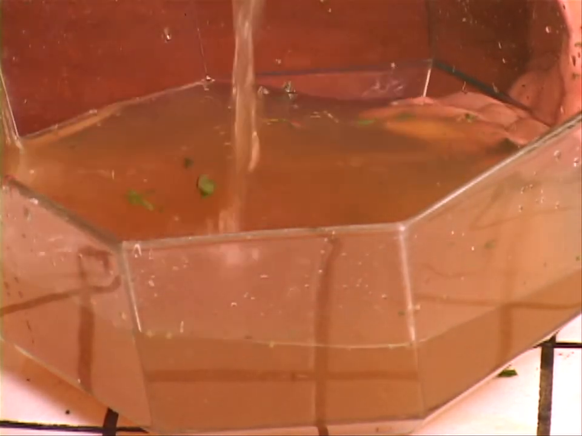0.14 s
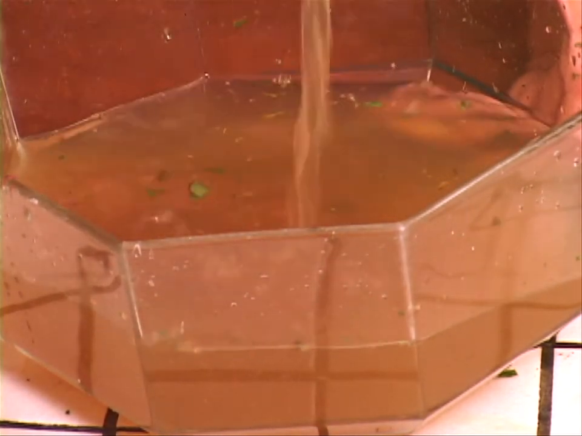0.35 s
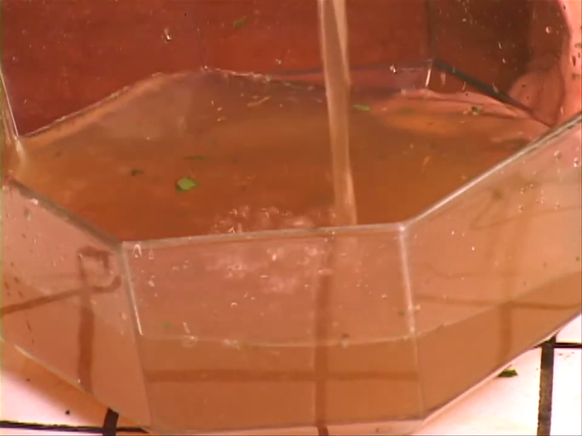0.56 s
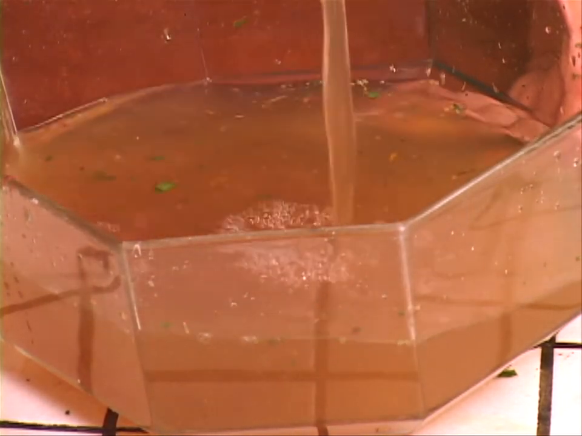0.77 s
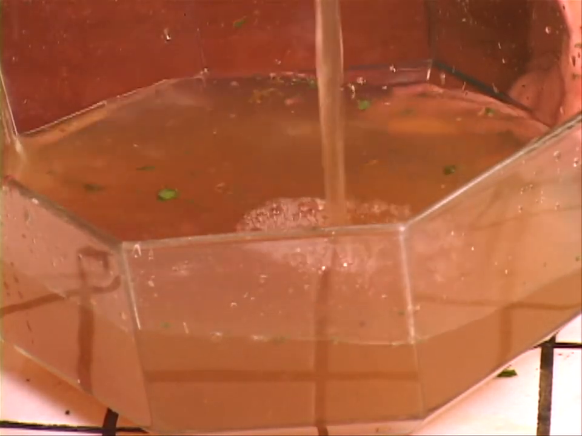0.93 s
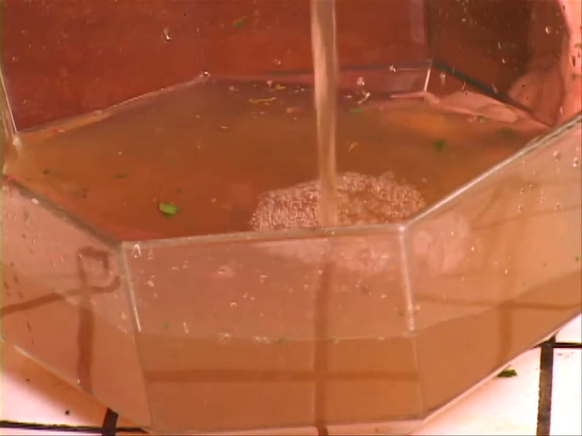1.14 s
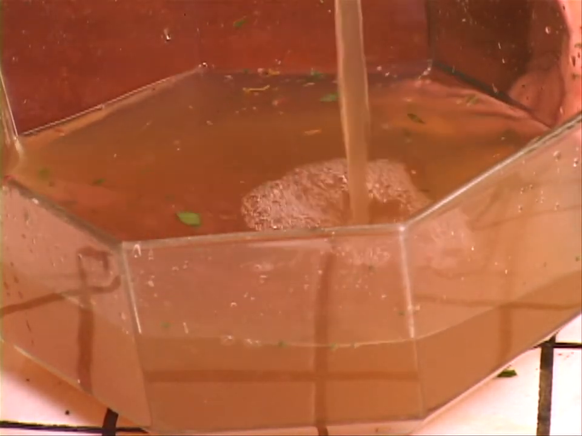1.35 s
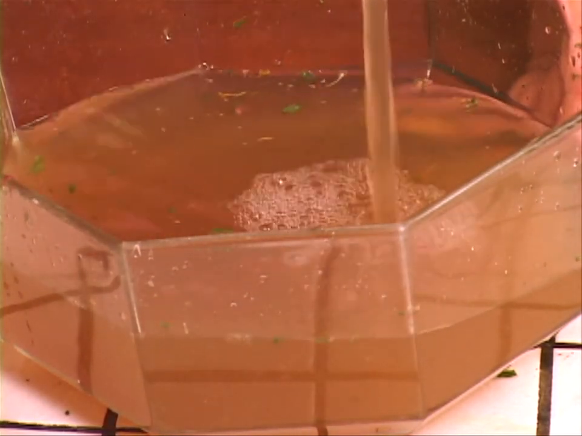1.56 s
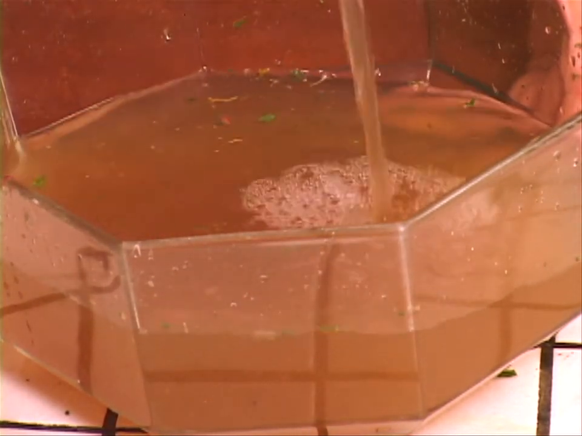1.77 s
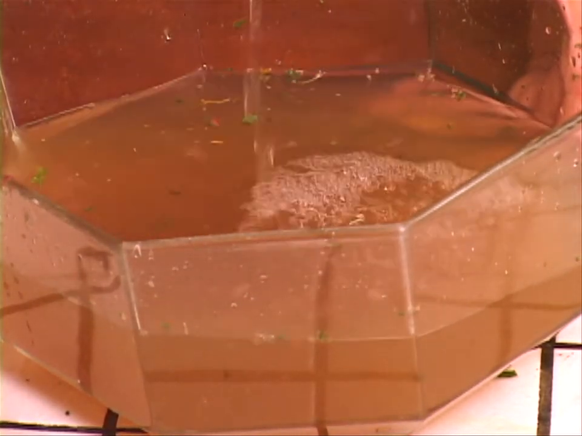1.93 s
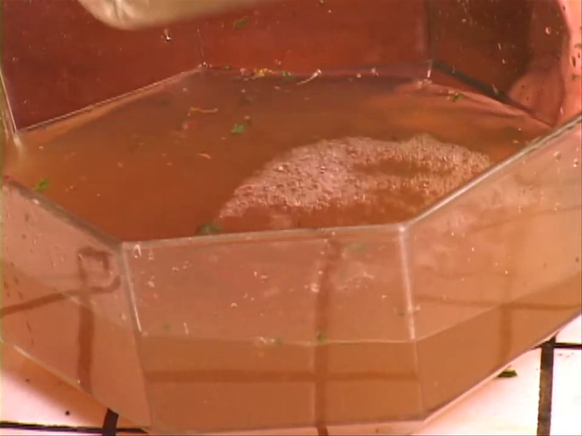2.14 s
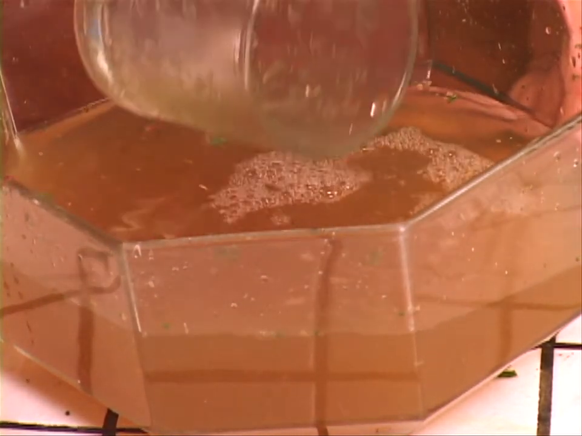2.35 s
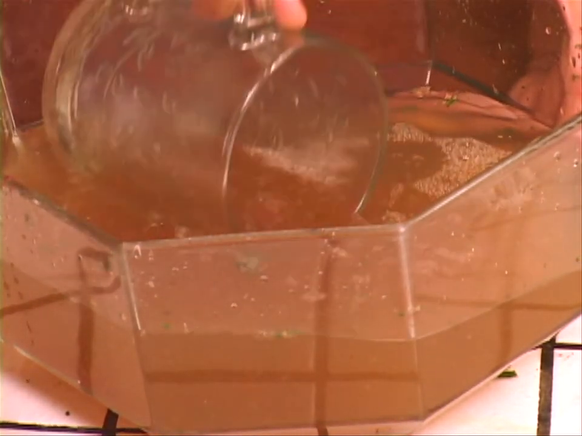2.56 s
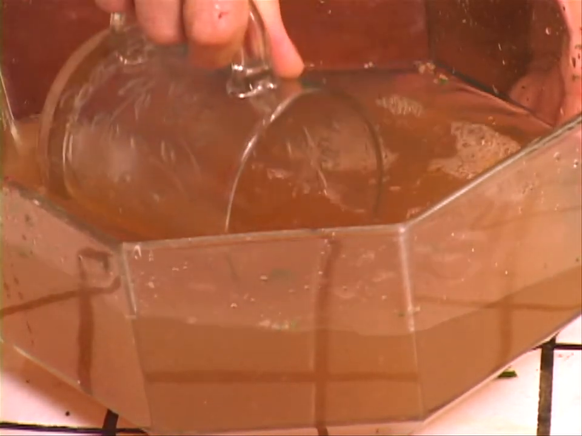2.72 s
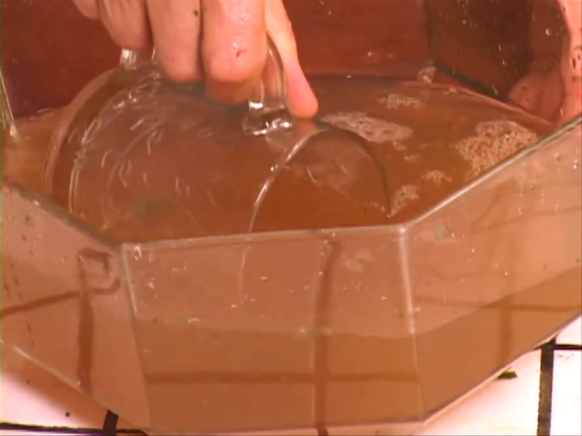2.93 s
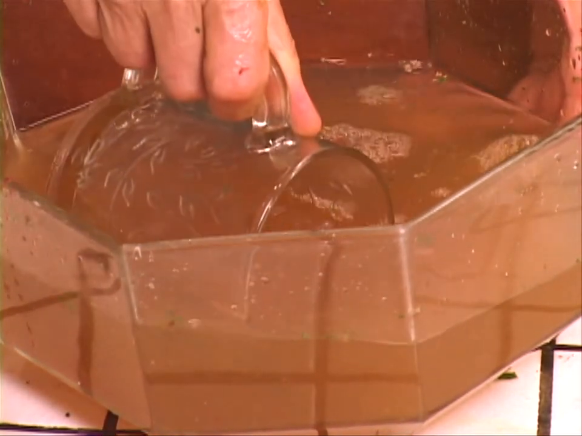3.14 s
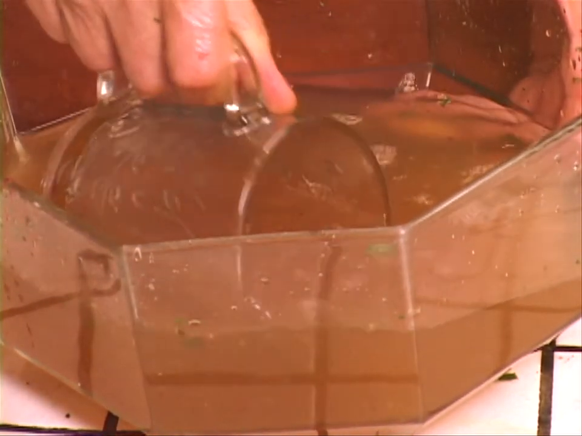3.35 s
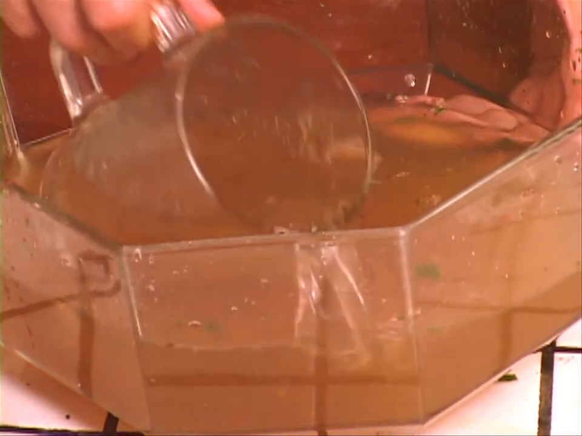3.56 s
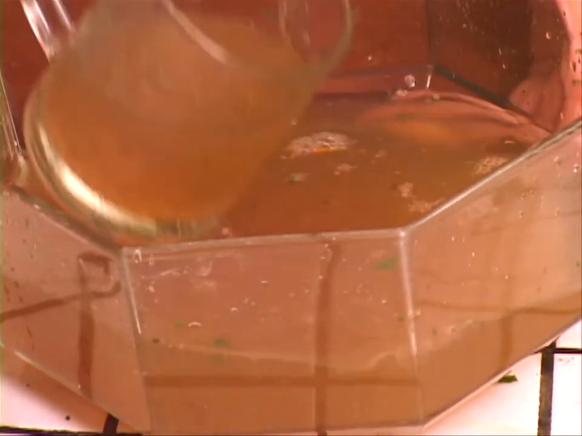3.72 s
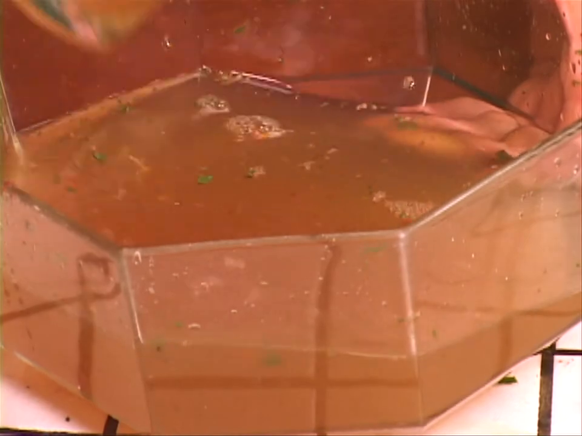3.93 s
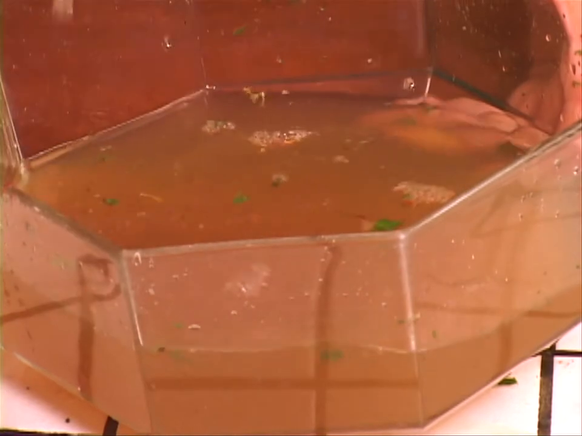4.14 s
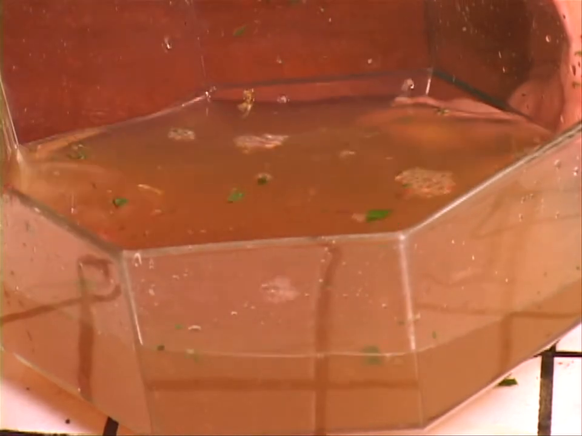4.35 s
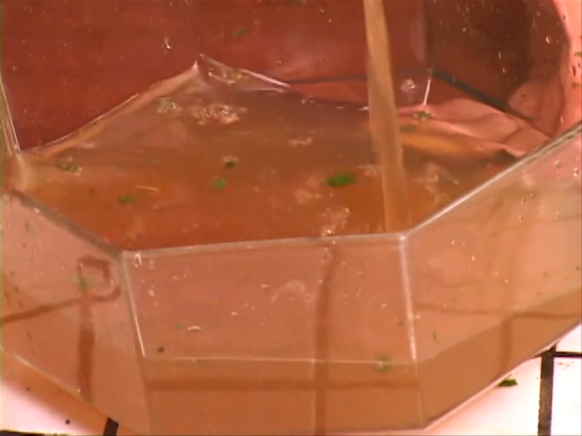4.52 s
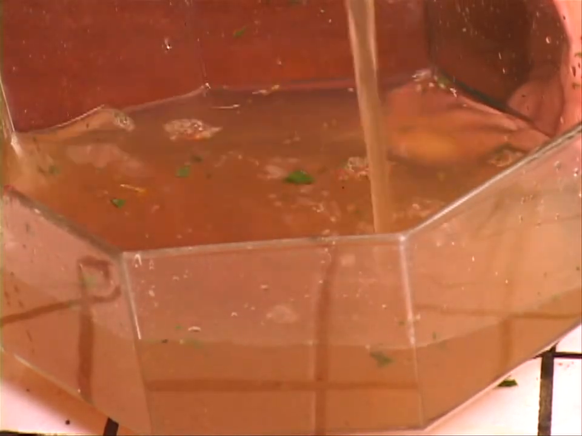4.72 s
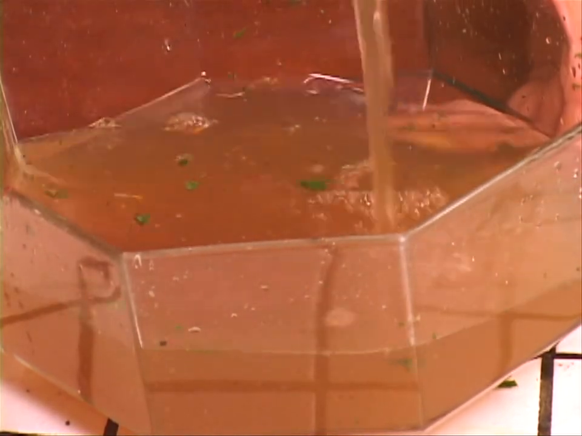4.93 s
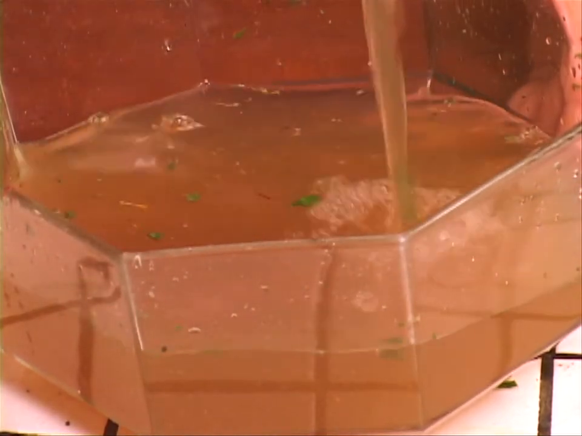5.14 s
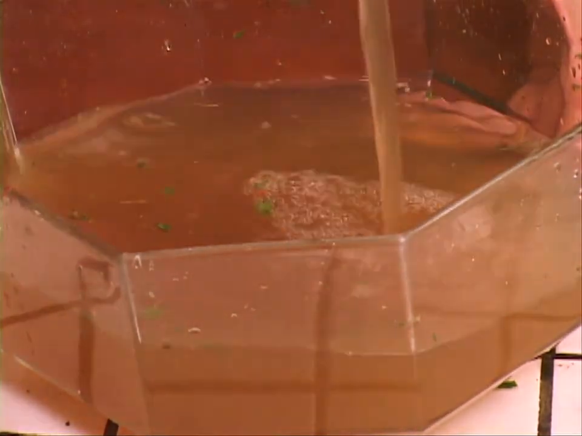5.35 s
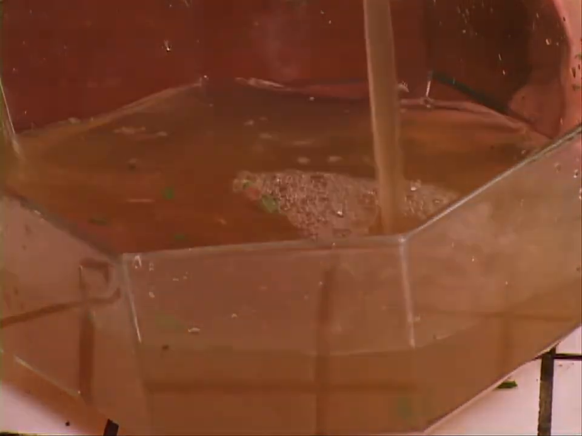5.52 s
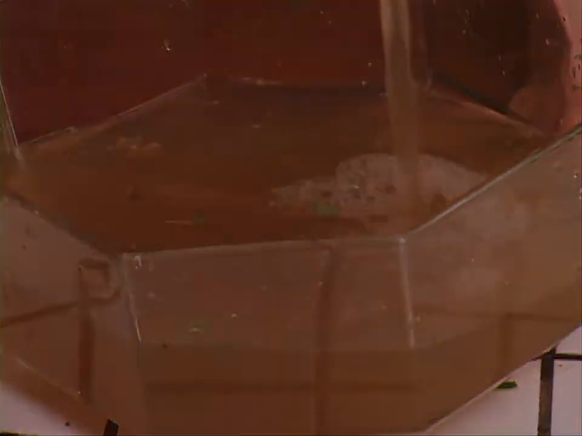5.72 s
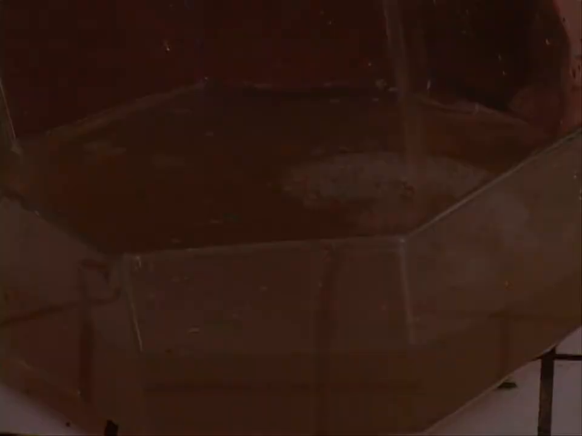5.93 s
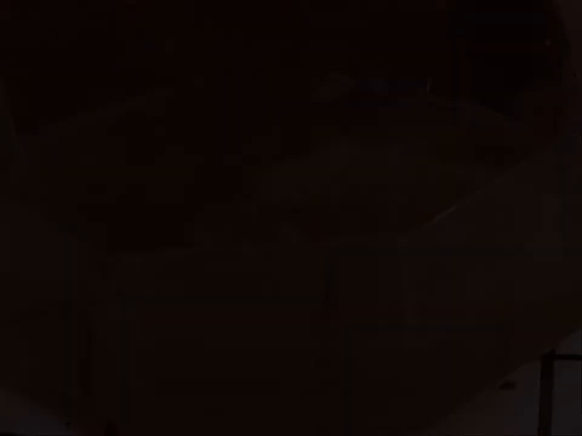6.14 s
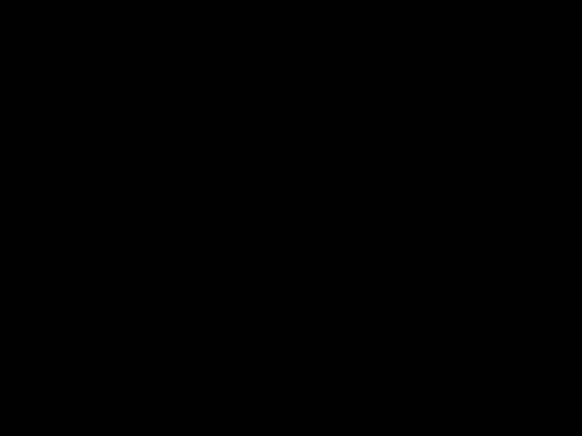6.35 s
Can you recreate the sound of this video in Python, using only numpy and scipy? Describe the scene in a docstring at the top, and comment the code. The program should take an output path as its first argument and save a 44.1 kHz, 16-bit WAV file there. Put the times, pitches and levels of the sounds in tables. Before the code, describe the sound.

In a small tiled kitchen, close to the microphone, water pours into a wide filled glass bowl with gulps, bubbles and fine ticking spray for two seconds. A quiet gap follows, with a submerged glass knock and then a sharp bright clink. A few faint drops lead to a second bubbly pour, which fades quickly to silence.

```python
"""In a small kitchen, water is poured twice from a glass mug into a wide glass bowl.
Each pour is a crowd of ringing air bubbles (short fading sine waves) with gulps and ticking spray;
stray drops plink before and after the first pour and before the second.
Between the pours the mug knocks the bowl under water and clinks on the way out (fading sines plus noise).
Air noise, a faint hum and a thin whine lie underneath, and everything fades away at the end."""
import sys
import numpy as np
from scipy import signal
from scipy.fft import rfft, irfft, next_fast_len
from scipy.io import wavfile
from scipy.ndimage import map_coordinates

SR = 44100
rng = np.random.default_rng(int(sys.argv[2]) if len(sys.argv) > 2 else 0)


def dump_mix(stems):
    """Bounce the given channels to the path in sys.argv[1] as a 16-bit WAV at rate SR."""
    frames = np.atleast_2d(stems).T  # one column per channel
    limited = np.clip(frames, -1, 1)  # hard clip at full scale
    pcm = np.round(limited * 32767).astype(np.int16)
    wavfile.write(sys.argv[1], SR, pcm)


N = 285768  # length in samples


def amp(db):
    """Turn decibels into a gain."""
    return 10 ** (np.asarray(db) / 20)


def unit(x):
    """Scale a sound to an rms level of 1."""
    return x / np.sqrt(np.mean(x ** 2) + 1e-20)


def along(points, hz):
    """Read a curve of (Hz, value) points, joined by straight lines over log frequency."""
    point_hz, value = np.transpose(points)
    return np.interp(np.log(hz + 1), np.log(point_hz), value)


def wobble(rate):
    """A smooth random curve with `rate` new random values a second."""
    knots = rng.standard_normal(int(N * rate / SR) + 4)
    return map_coordinates(knots, [np.arange(N) * rate / SR])


def coloured(x, points):
    """Filter a sound to the gains of the (Hz, dB) points, with no ringing ahead of the sound."""
    m = 2 * next_fast_len(len(x) // 2 + 4096)
    log_gain = np.log(amp(along(points, np.fft.rfftfreq(m, 1 / SR))))
    # folding the cepstrum onto positive times gives the minimum-phase filter
    cepstrum = irfft(log_gain, m)
    cepstrum[1:m // 2] *= 2
    cepstrum[m // 2 + 1:] = 0
    return irfft(rfft(x, m) * np.exp(rfft(cepstrum)), m)[:len(x)]


def add(track, s, sound):
    """Mix a sound into the track at time s, in seconds."""
    i = max(round(s * SR), 0)
    track[i:i + len(sound)] += sound[:len(track) - i]


def bubble(t, hz, t60, rise):
    """A trapped bubble rings and loses 60 dB in t60 seconds; its pitch climbs as it nears the surface."""
    age = t / t60
    cycles = hz * t * (1 + rise * np.minimum(age, 1) / 2)
    return amp(-60 * age) * np.sin(2 * np.pi * cycles)


def background(air_db, hum_db, whine_db):
    """Filtered noise for room air, a wavering appliance hum and a high electrical whine of even level."""
    # Colour of the room air. Each row: frequency in Hz, relative level in dB.
    air_colour = [(22, -24), (50, -4.5), (85, -8.5), (130, 0.5), (220, -2.5), (330, -8.5), (490, -8),
                  (600, -14.5), (1000, -16.5), (2500, -22), (6000, -23.5), (9500, -22.5), (15000, -26)]
    # Tones of the appliance hum. Each row: frequency in Hz, relative level in dB.
    hum_tones = [(60, -75), (120, -73.5), (179, -70), (209, -68), (238, -80), (297, -71.5), (356, -72),
                 (490, -70.5), (771, -82), (1655, -87.5)]
    # Tones of the electrical whine. Each row: frequency in Hz, relative level in dB.
    whine_tones = [(15630, -74), (15690.5, -69), (15731.5, -64), (15751, -79)]
    # Loudness of all three over time. Each row: time in seconds, gain in dB.
    loudness = [(0, 1.5), (5.4, 0.5), (5.9, -5)]
    t = np.arange(N) / SR
    air = amp(air_db) * unit(coloured(rng.standard_normal(N), air_colour))
    hum, whine = np.zeros(N), np.zeros(N)
    for hz, db in hum_tones:
        level = amp(db + 4.2 * wobble(5))
        hum += level * np.sin(2 * np.pi * hz * t + 0.63 * wobble(6))
    for hz, db in whine_tones:
        whine += amp(db) * np.sin(2 * np.pi * hz * t + 0.17 * wobble(7.6))
    tones = np.sqrt(2) * (amp(hum_db) * hum + amp(whine_db) * whine)  # sqrt(2): sine peak from rms
    return (air + tones) * amp(np.interp(t, *np.transpose(loudness)))


def ticks(level_db, t60, crack_db, crack_t60):
    """Flying droplets land with a tiny crack of noise and leave a very small ringing bubble."""
    # The sharpest ticks of spray. Each row: start in seconds, relative level in dB, starting pitch in Hz.
    landings = [(0.0273, -30, 8430), (0.183, -30, 9000), (0.195, -33, 8460), (0.2738, -29, 9600),
                (0.3371, -35.5, 5660), (0.4294, -32.5, 8400), (0.4883, -27, 10900), (0.4934, -28, 9600),
                (0.5152, -30.5, 9800), (0.5778, -33.5, 8500), (0.622, -30.5, 6020), (0.6845, -37, 7970),
                (0.7607, -36, 10500), (0.9996, -35, 6700), (1.3004, -32, 10120), (1.4456, -35.5, 7650),
                (1.8226, -40.5, 5830), (2.0842, -40.5, 8190), (3.6082, -42, 9700), (4.4862, -48, 13900),
                (4.593, -30, 5900), (4.7481, -32, 5250), (4.8803, -35, 11700), (4.9152, -32, 12600),
                (4.9975, -29, 7500), (5.445, -36, 9880), (5.8052, -38, 8540)]
    out, t = np.zeros(N), np.arange(SR // 40) / SR
    for s, db, hz in landings:
        crack_colour = [(1500, -26), (hz * 0.46, -13), (hz, 0), (16000, -8)]  # (Hz, dB)
        crack = unit(coloured(rng.standard_normal(len(t)), crack_colour))
        fading_crack = amp(crack_db - 60 * t / crack_t60) * crack
        add(out, s, amp(db + level_db) * (bubble(t, hz, t60, 0.15) + fading_crack))
    return out


def slap(t, hz, t60):
    """The surface closes over a bubble with a brief splash of noise, scaled to a peak of 1."""
    # Colour of the splash. Each row: multiple of the bubble's pitch, relative level in dB.
    splash_colour = [(.17, -29), (.8, -5), (1, -1.5), (1.2, -6.5), (2.6, -20.5), (8, -23.5), (25, -31.5)]
    fading_noise = rng.standard_normal(len(t)) * amp(-60 * t / t60)
    splash = coloured(fading_noise, sorted((hz * k, db) for k, db in splash_colour))
    return splash / np.abs(splash).max()


def drips(level_db, slap_db, slap_t60, rise, twin_db, twin_ratio, twin_t60):
    """A drop slaps the surface and leaves one ringing bubble with a smaller, higher twin."""
    # Plinking drops, alone or beside the stream. Each row: start in seconds, relative level in dB,
    # starting pitch in Hz, time to fall by 60 dB in seconds.
    plinks = [(0.0276, -30.5, 1870, 0.0032), (0.0882, -30, 827, .14), (0.126, -39, 2850, .04),
              (0.148, -43.5, 2650, 0.08), (0.1702, -34, 3160, 0.014), (0.251, -33, 1245, 0.021),
              (0.273, -35, 1640, 0.049), (0.391, -34.5, 1890, 0.032), (0.484, -34.5, 1840, 0.039),
              (0.686, -38, 2190, 0.025), (1.166, -38, 2006, .06), (1.241, -38.5, 2053, 0.052),
              (1.779, -36, 1160, 0.033), (2.0458, -28.5, 1214, 0.03), (2.048, -41.5, 1707, 0.029),
              (4.321, -42.5, 1386, 0.14), (4.322, -42, 1770, 0.038), (4.542, -33.5, 1270, 0.051),
              (4.545, -39.5, 1754, 0.15), (4.596, -37.5, 1845, 0.063), (4.598, -38.5, 3010, .03),
              (4.875, -39, 1894, 0.066), (4.978, -29, 2166, 0.027), (5.243, -35.5, 880, 0.012),
              (5.281, -36.5, 2480, 0.016), (5.446, -38.5, 890, 0.018)]
    out, t = np.zeros(N), np.arange(SR // 7) / SR
    for s, db, hz, t60 in plinks:
        main = bubble(t, hz, t60, rise)
        twin = amp(twin_db) * bubble(t, hz * twin_ratio, twin_t60, rise)
        splash = amp(slap_db) * slap(t, hz, slap_t60)
        add(out, s, amp(db + level_db) * (main + twin + splash))
    return out


def kitchen(x, early, early_s):
    """Tiled walls answer with fading noise, drawn afresh every third of a second as the stream moves."""
    # How long the room rings. Each row: frequency in Hz, time to fall by 60 dB in seconds.
    ring_time = [(100, 0.99), (500, 0.57), (1500, 0.49), (4000, 0.33), (14000, 0.068)]
    out, hop = np.zeros(N), SR // 3
    starts = range(0, N, hop)
    # each frequency band of the noise fades at its own speed
    hz, t, bands = signal.stft(rng.standard_normal((len(starts), hop)), SR, nperseg=256)
    fade = amp(-60 * t / along(ring_time, hz)[:, None])
    tails = signal.istft(bands * fade, SR, nperseg=256)[1]
    # near walls come first and strongest
    tails *= 1 + early * np.exp(-np.arange(tails.shape[1]) / SR / early_s)
    for i, tail in zip(starts, tails):
        echo = signal.fftconvolve(x[i:i + hop], tail / np.linalg.norm(tail))
        add(out, i / SR + .003, echo)  # the first echo is 3 ms late
    return out


def swarm(span, low_hz, high_hz, rate, cycles, spread_db, rise):
    """Bubbles of one size range are born at random, with about equal energy per Hz."""
    count = int(rate * span)
    when, size, luck, damping = rng.random((count, 4)).T
    hz = low_hz + (high_hz - low_hz) * size
    life = cycles * 2 ** (2 * damping - 1) / hz  # seconds to fall by 60 dB
    gain = amp(-spread_db * np.log(.03 + .97 * luck)) / np.sqrt(life)  # a lucky few are much louder
    t = np.arange(int(1.5 * cycles / low_hz * SR)) / SR
    grains = gain[:, None] * bubble(t, hz[:, None], life[:, None], rise)
    where = (when * span * SR).astype(int)[:, None] + np.arange(len(t))
    # add up all bubbles that sound at the same sample
    return np.bincount(where.ravel(), grains.ravel(), int(span * SR))[:int(span * SR)]


def pour(flow, colour, density, spread_db, large_db, small_db, spray_db, surge_db, flutter_db, foam_db_per_s):
    """The stream drives three sizes of bubble and surges at random; foam steadily dulls the finer two.

    A negative foam_db_per_s makes those two grow louder instead.
    """
    s, strength_db = np.transpose(flow)
    span = s[-1] - s[0]
    large = swarm(span, 241.0, 1320, rate=300 * density, cycles=27, spread_db=0.56 * spread_db, rise=0.3)
    small = swarm(span, 1281, 3910, rate=550 * density, cycles=67, spread_db=spread_db, rise=0.46)
    spray = swarm(span, 3900, 15500, rate=1700 * density, cycles=58, spread_db=1.2 * spread_db, rise=0.097)
    t = np.arange(len(large)) / SR
    edges = np.clip(np.minimum(t, span - t) / 0.038, 0, 1)  # short fades at both ends
    flow_db = np.interp(s[0] + t, s, strength_db) + surge_db * wobble(22.83)[:len(t)]
    foam_db = foam_db_per_s * t
    out = np.zeros(N)
    for grains, db in [(large, large_db), (small, small_db - foam_db), (spray, spray_db - foam_db)]:
        own_db = db + flutter_db * wobble(45.38)[:len(t)]  # each size also comes in clumps of its own
        add(out, s[0], unit(coloured(grains, colour)) * edges * amp(flow_db + own_db))
    return out


def resonant(x):
    """The open bowl's resonances ring on top of the direct sound."""
    # Fixed resonances of the bowl. Each row: frequency in Hz, width in Hz, gain in dB.
    hollow = [(500, 40, -9), (600, 45, -8), (1040, 45, -1), (2090, 60, -5), (2780, 110, -7), (3430, 90, -5)]
    m = next_fast_len(N)
    f = np.fft.rfftfreq(m, 1 / SR)
    response = 1
    for hz, width, db in hollow:
        response = response + amp(db) * 1j * f * width / (hz * hz - f * f + 1j * f * width)
    return irfft(rfft(x, m) * response, m)[:N]


def gulps(level_db, slap_db, slap_t60, shed_db, rise):
    """A dragged-down air pocket closes with a slap, rings longer the deeper its pitch, and sheds bubbles."""
    # Big pockets of air. Each row: start in seconds, relative level in dB, starting pitch in Hz.
    pockets = [(0.157, -29.5, 577), (0.297, -32.5, 424), (0.428, -34.5, 440), (0.485, -37, 422),
               (0.543, -38, 499), (0.591, -35, 495), (0.621, -32, 460), (0.759, -34.5, 468),
               (0.964, -34, 474), (1.182, -35.5, 447), (1.214, -32.5, 458), (1.445, -38.5, 483),
               (1.592, -37.5, 710), (1.824, -30.5, 663), (4.587, -28.5, 738), (4.593, -28, 497),
               (4.763, -36, 488), (4.874, -37.5, 483), (4.915, -31, 572), (4.962, -35, 767),
               (4.969, -29, 600), (5.029, -36, 680), (5.144, -30, 507), (5.279, -31.5, 595),
               (5.325, -33.5, 585), (5.512, -35, 674), (5.995, -33.5, 669), (6.025, -43.5, 619),
               (6.073, -40, 593)]
    # Lowest and highest pitch of the shed bubbles, as multiples of the pocket's pitch.
    low_ratio, high_ratio = (1.2, 3.81)
    pocket_cycles, shed_cycles = 29.4, 24  # periods to fall by 60 dB
    attack_s, shed_within_s = 0.00049, .007  # closing time of a pocket; latest break-away of a bubble
    out, t = np.zeros(N), np.arange(SR // 7) / SR
    for s, db, hz in pockets:
        pocket = bubble(t, hz, pocket_cycles / hz, rise) + amp(slap_db) * slap(t, hz, slap_t60)
        add(out, s, amp(db + level_db) * (1 - np.exp(-t / attack_s)) * pocket)
        for delay, size in rng.random(size=(4, 2)):
            ratio = low_ratio * (high_ratio / low_ratio) ** size
            shed = bubble(t, hz * ratio, shed_cycles / (hz * ratio), rise)
            add(out, s + shed_within_s * delay, amp(db + shed_db) / ratio * shed)
    return out


def touches(ring_db, click_t60):
    """Each touch clicks and rings only some of the mug's tones: soft grazes the low, a hard clink the high."""
    # Light touches of the mug. Each row: start in seconds, relative ring level in dB,
    # lowest and highest tone woken in Hz, click peak in dB.
    contacts = [(3.023, -32, 1936, 2230, -65.5), (3.354, -55.5, 2300, 2920, -64.5),
                (3.361, -54, 1406, 2980, -48), (3.368, -49, 1400, 2930, -61.5),
                (3.373, -62, 1400, 2770, -65), (3.692, -36, 3170, 9200, -39.5),
                (3.6929, -40.5, 3060, 10890, -24)]
    # Tones of the mug. Each row: frequency in Hz, relative level in dB, time to fall by 60 dB in seconds.
    mug = [(1490, -1, .12), (1712, 1.5, 0.12), (1943, -17, .06), (2417, -0.5, .16), (2740, 8, 0.055),
           (2906, 3, 0.12), (3010, -13.5, 0.11), (3070, 9.5, 0.0475), (3300, -8, 0.16), (3410, -2.5, 0.048),
           (4900, -8.5, 0.044), (5950, -7, 0.063), (6740, -18, .05), (7350, -23, 0.069), (7300, -13, 0.036),
           (8370, -19, .035), (10520, -14, .05)]
    # Colour of glass on glass. Each row: frequency in Hz, relative level in dB.
    click_colour = [(1500, -33.5), (2700, -29), (3300, -13), (4100, -17), (6000, -14), (6650, -16.5),
                    (7300, 3.5), (7900, -13), (8400, -1.5), (9000, -11.5), (16000, -25)]
    out, t = np.zeros(N), np.arange(SR // 3) / SR
    for s, db, low_hz, high_hz, click_db in contacts:
        ring = np.zeros(len(t))
        for hz, level, t60 in mug:
            woken = 1 / (1 + (low_hz / hz) ** 30 + (hz / high_hz) ** 30)  # near 1 inside the woken range
            tone = np.sin(2 * np.pi * (hz * t + rng.random()))
            ring += woken * amp(level - 60 * t / t60) * tone
        click = coloured(rng.standard_normal(len(t)) * amp(-60 * t / click_t60), click_colour)
        add(out, s, amp(db + ring_db) * ring + amp(click_db) * click / np.abs(click).max())
    return out


def knock(ring_db, thud_db, thud_t60, blow_db):
    """The mug meets the bowl under water: one sharp push, a short thud of noise and damped glass tones."""
    # Mug against bowl. Each row: start in seconds, relative level in dB, contact time in seconds.
    hits = [(3.0586, -23, .0004)]
    # Tones of the filled bowl. Each row: frequency in Hz, relative level in dB,
    # time to fall by 60 dB in seconds.
    bowl = [(90, -18, 0.15), (108, -12, 0.18), (167, -13.5, 0.097), (292.8, -14, 0.43), (332, -11.5, 0.24),
            (440, -14, 0.3), (686, -19, 0.4), (790, -13.5, .2), (960, -10, .35), (1026, -6, 0.35),
            (1104, -11.5, .23), (1410, -7, .4), (1510, -5.5, .36), (1653, -17.5, .45), (1730, -2.5, .16),
            (2369, -11, 0.21), (2600, -28.5, .25), (2730, -23, .25), (3009, -22, 0.33)]
    # Colour of the push and the thud. Each row: frequency in Hz, relative level in dB.
    thud_colour = [(30, -55), (58, -29.5), (100, 6.5), (200, -11.5), (370, -2.5), (570, -14), (1010, -5),
                   (1240, -13), (1420, 0.5), (1710, -4), (2100, -32.5), (2400, 0.5), (3030, -25),
                   (3500, -32.5), (7900, -37.5), (15000, -57.5)]
    out, t = np.zeros(N), np.arange(SR * 3 // 4) / SR
    for s, db, contact in hits:
        ring = sum(amp(level - 60 * t / t60) * np.sin(2 * np.pi * hz * t) for hz, level, t60 in bowl)
        thud = unit(coloured(rng.standard_normal(len(t)), thud_colour)) * amp(-60 * t / thud_t60)
        blow = coloured(signal.unit_impulse(len(t)), thud_colour)
        blow = blow / np.abs(blow).max()
        body = amp(ring_db) * ring + amp(thud_db) * thud + amp(blow_db) * blow
        add(out, s, amp(db) * (1 - np.exp(-t / contact)) * body)  # the contact softens the start
    return out


def bumps(t60):
    """Water rocks against the bowl in soft low bumps as the full mug is lifted out."""
    # Soft bumps. Each row: start in seconds, level in dB, pitch in Hz.
    rocking = [(3.605, -51, 60), (3.655, -54, 42), (3.666, -55, 155)]
    out, t = np.zeros(N), np.arange(SR // 3) / SR
    for s, db, hz in rocking:
        add(out, s, amp(db) * (1 - np.exp(-t / 0.0054)) * bubble(t, hz, t60, 0))
    return out


def scene():
    """Two pours and the scoop between them, in the kitchen."""
    # Strength of the stream in each pour. Each row: time in seconds, relative level in dB.
    first_flow = [(0.11, -44), (0.206, -50.5), (0.574, -46), (0.806, -51.5), (1.222, -48.5), (1.59, -53.5),
                  (1.828, -53.5), (1.936, -48.5), (2.05, -66)]
    second_flow = [(4.57, -46), (4.594, -42.5), (4.73, -49.5), (5.162, -46.5), (5.72, -55), (5.814, -53.5),
                   (5.966, -69), (6.048, -54), (6.1, -81)]
    # Colour of each pour. Each row: frequency in Hz, relative level in dB.
    first_colour = [(100, -40), (280, -3.5), (370, -9), (450, -1.5), (660, -7), (1000, -3), (1550, -8),
                    (2080, -5), (2500, -15), (3200, -7.5), (3900, -20), (10000, -24), (15500, -29)]
    second_colour = [(100, -40.5), (320, -12.5), (390, -22), (490, -15.5), (600, -6), (870, -8.5),
                     (1080, -10), (1530, -10.5), (1850, -0.5), (2500, -15.5), (2800, -7), (3700, -19),
                     (7500, -21.5), (15500, -28.5)]
    first = pour(first_flow, first_colour, density=1.4, spread_db=5.5, large_db=-5.0, small_db=-6.5,
                 spray_db=-8.5, surge_db=1.0, flutter_db=2.5, foam_db_per_s=1.25)
    second = pour(second_flow, second_colour, density=1.9, spread_db=6.0, large_db=-2.5, small_db=-6.5,
                  spray_db=-7.0, surge_db=1.4, flutter_db=1.97, foam_db_per_s=-0.4)
    stream = resonant(first + second)
    drops = gulps(level_db=-1.6, slap_db=-3, slap_t60=0.022, shed_db=-6.5, rise=0.089)
    drops += drips(level_db=-2.26, slap_db=-4, slap_t60=0.02, rise=0.16,
                   twin_db=-13.5, twin_ratio=1.5, twin_t60=0.037)
    spray = ticks(level_db=-4, t60=0.011, crack_db=-4, crack_t60=0.022)
    glass = knock(ring_db=-9.5, thud_db=-0.5, thud_t60=0.11, blow_db=-2)
    glass += touches(ring_db=-7.5, click_t60=0.0043)
    # each source sends its own share into the room
    sent = amp(-8.0) * stream + amp(-5.5) * drops + amp(-7.5) * spray + amp(-9) * glass
    room = kitchen(sent, early=1.7, early_s=0.012)
    low_bumps = bumps(t60=0.3)
    faint = background(air_db=-61, hum_db=-6.0, whine_db=-4.5)
    return (stream + drops + spray + glass + room + low_bumps + faint)[None]


def record(dry):
    """The deepest bass is cut away; a closing fade and a sharp treble limit follow."""
    bass_cut_hz, top_hz = 53, 16000
    thin = signal.sosfilt(signal.butter(2, bass_cut_hz, "highpass", fs=SR, output="sos"), dry)
    fade = np.clip((6.22 - np.arange(N) / SR) / 0.15, 0, 1) ** 1.05  # silent from 6.22 s
    m = next_fast_len(N)
    kept = np.fft.rfftfreq(m, 1 / SR) < top_hz
    return irfft(rfft(thin * fade, m) * kept, m)[:, :N]


dry = scene()
out = record(dry)
dump_mix(out)
```